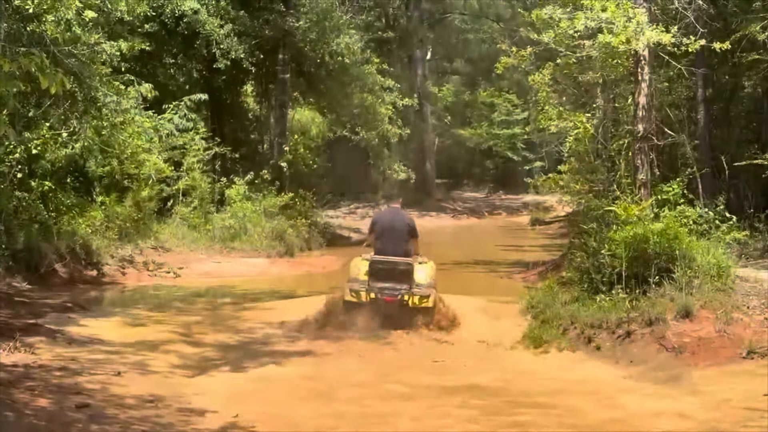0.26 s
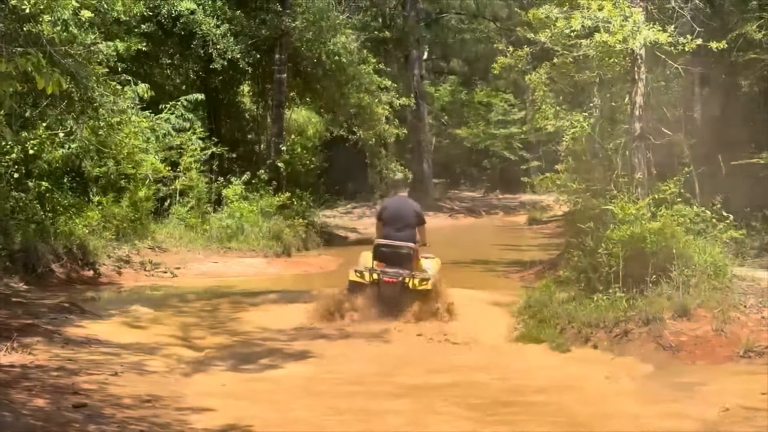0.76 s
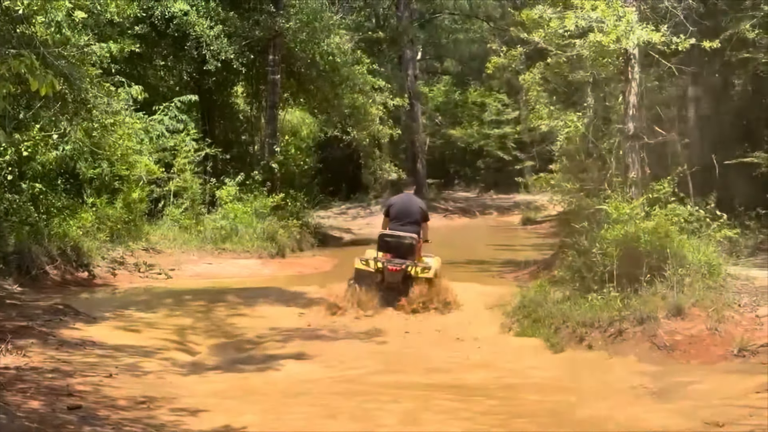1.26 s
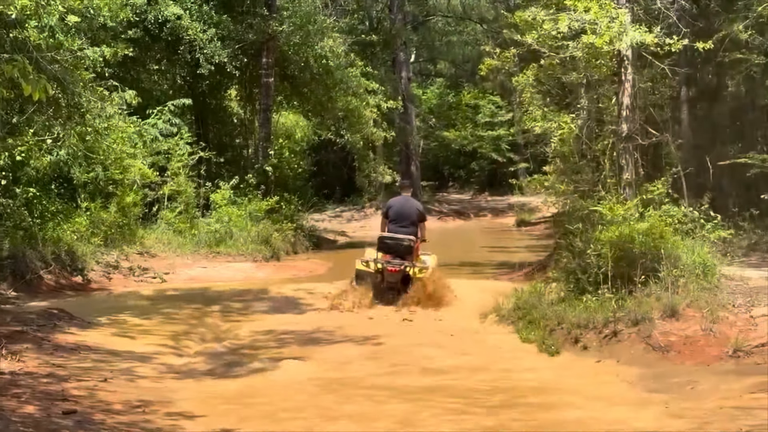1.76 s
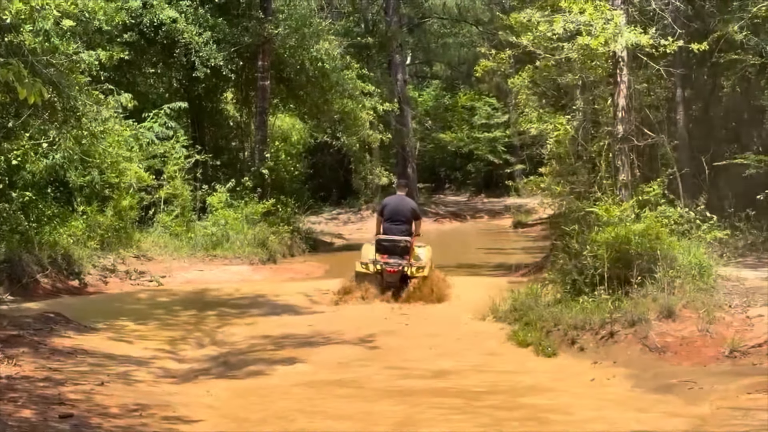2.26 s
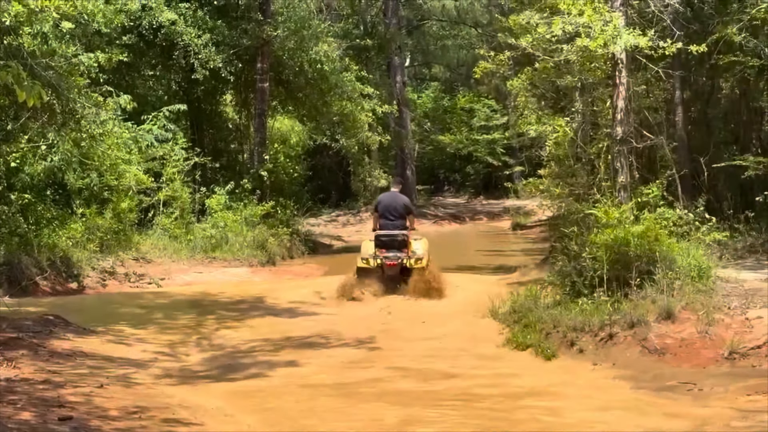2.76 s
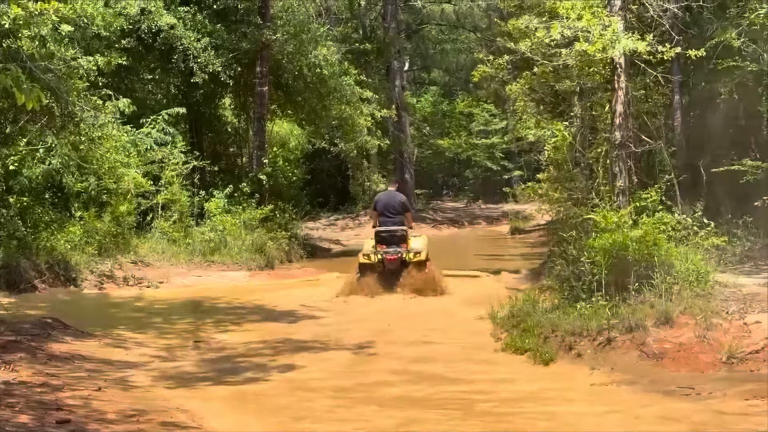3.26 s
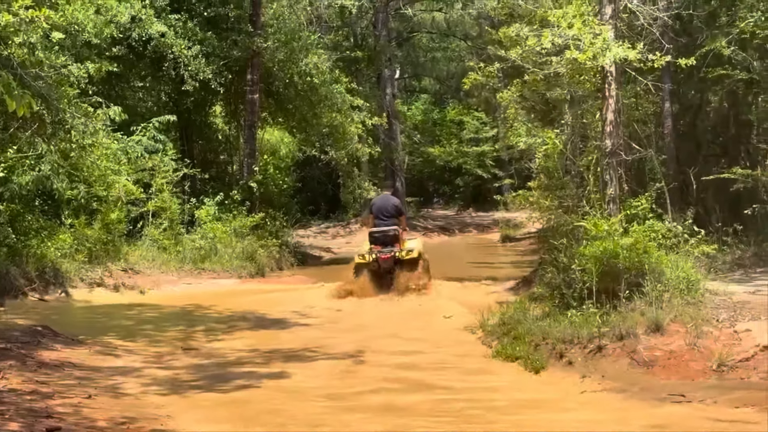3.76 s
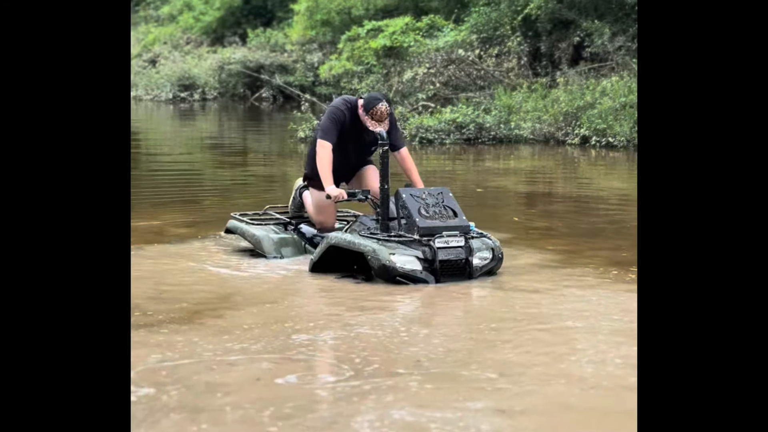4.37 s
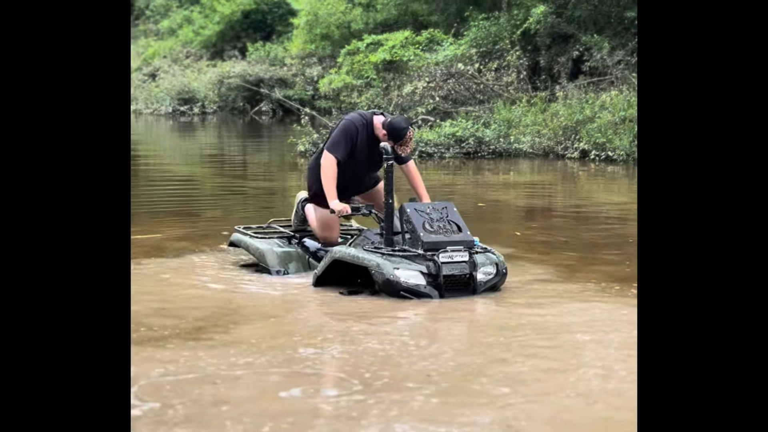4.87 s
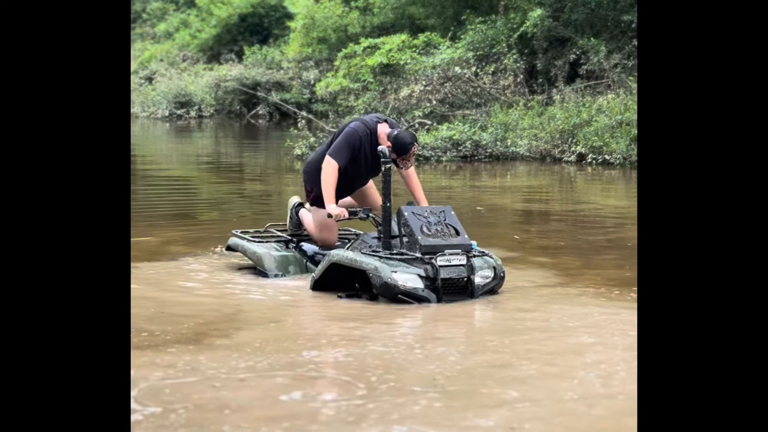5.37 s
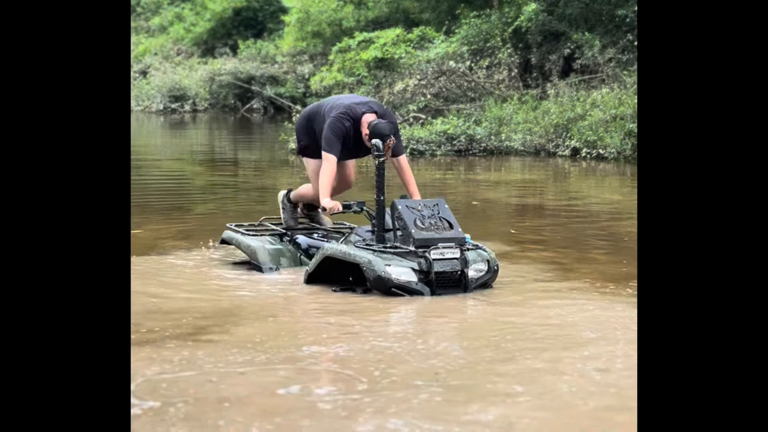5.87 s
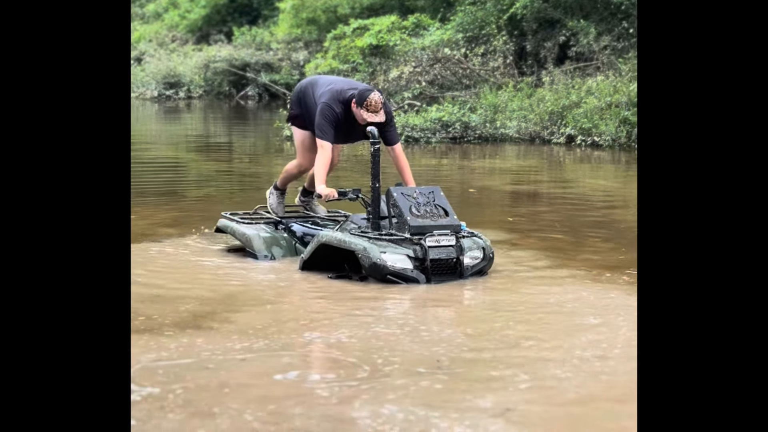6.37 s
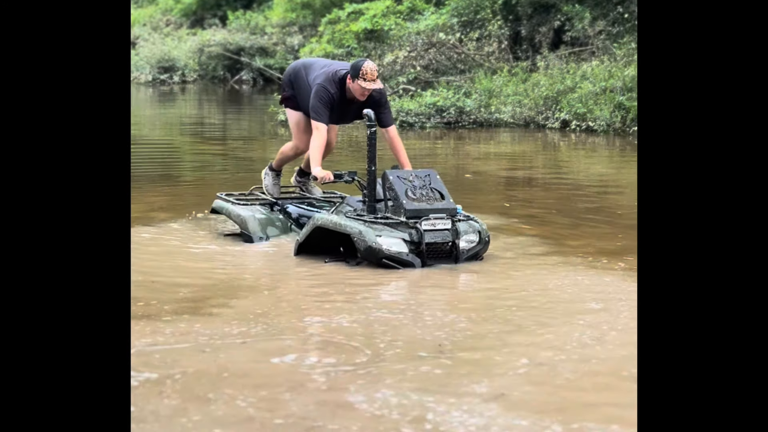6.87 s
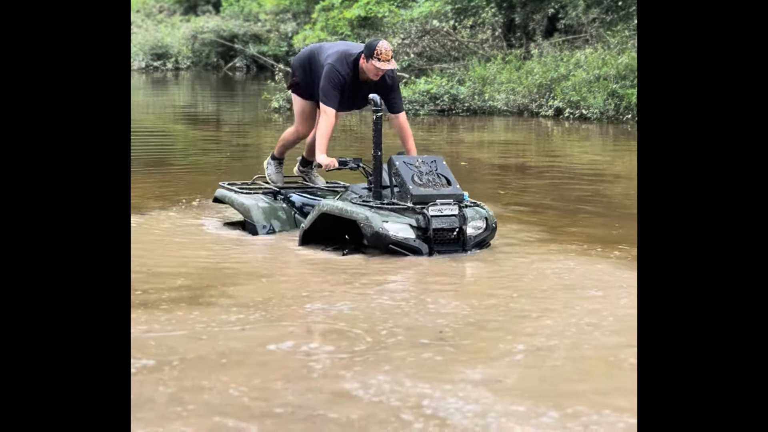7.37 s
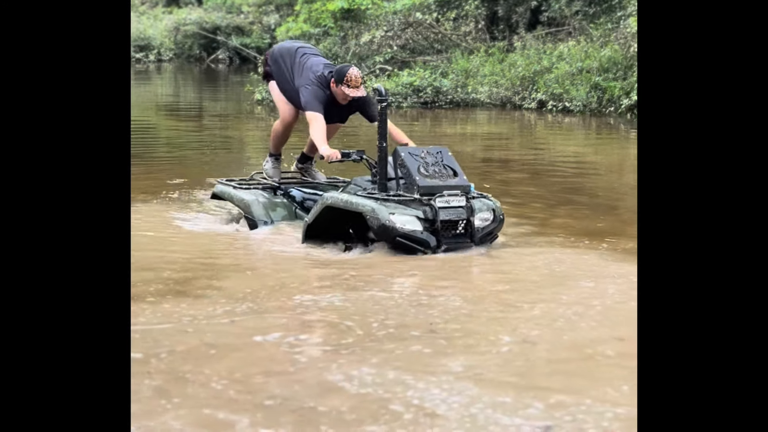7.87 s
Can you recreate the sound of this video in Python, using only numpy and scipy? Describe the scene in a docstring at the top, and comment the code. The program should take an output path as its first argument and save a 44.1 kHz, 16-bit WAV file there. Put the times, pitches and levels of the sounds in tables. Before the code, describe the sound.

Two quad engines in turn, outdoors. First, a muffled uneven chug with a low wavering hum and hollow barking churn, almost no treble. Then, heard closer and clearer, a single-cylinder idle thuds evenly about twelve times a second through water, with soft ticking, popping bubbles and airy hiss that swells as droplets thicken at the end.

```python
"""Two scenes, one after the other. First a twin-cylinder quad bike ploughs through mud, slowed and dull: paired
exhaust thumps, a hollow churning noise that barks now and then, pipe overtones and a low beating hum.
At 3.958 s a single-cylinder quad takes over, idling almost under water: each firing thumps up as a big bubble,
a smaller gulp follows, noise wheezes through intake resonances, a valve knocks, bubbles pop, the creek hisses;
at last the water surges: hiss grows, droplets thicken and a note sings twice."""
import sys
import numpy as np
from scipy import signal
from scipy.fft import rfft, irfft, next_fast_len
from scipy.io import wavfile
from scipy.ndimage import uniform_filter1d, map_coordinates

SR = 44100
rng = np.random.default_rng(int(sys.argv[2]) if len(sys.argv) > 2 else 0)


def log_audio(samples):
    """Write samples as a 16-bit WAV file to the path given in sys.argv[1]."""
    # one column per channel
    frames = np.atleast_2d(samples).T
    # limit to full scale, then quantise
    limited = np.clip(frames, -1, 1)
    pcm = np.round(limited * 32767).astype(np.int16)
    wavfile.write(sys.argv[1], SR, pcm)


N = 358091
T = np.arange(N) / SR
CUT_S = 3.958


def amp(db):
    """Gain of a level in dB."""
    return 10 ** (np.asarray(db) / 20)


def unit(x):
    """x at rms 1."""
    return x / np.sqrt(np.mean(x ** 2) + 1e-20)


def along(points, hz):
    """Each column after the frequency, interpolated on a log-frequency axis."""
    f, *cols = np.transpose(points)
    return [np.interp(np.log(hz + 1), np.log(f + 1), c) for c in cols]


def curves(rows, at_s=T):
    """Each column after the time, interpolated at the given times."""
    s, *cols = np.transpose(rows)
    return [np.interp(at_s, s, c) for c in cols]


def wobble(knots_per_s):
    """A smooth random curve through normally distributed knots."""
    knots = rng.standard_normal(int(N * knots_per_s / SR) + 4)
    return map_coordinates(knots, [T * knots_per_s])


def swell(at_s, width_s):
    """Gaussian bump in time: 1 at its centre, 1/e one width away."""
    return np.exp(-((T - at_s) / width_s) ** 2)


def window(cycle, start, length):
    """Half-sine over a part of each cycle, 0 outside it; start and length in cycles."""
    return np.sin(np.pi * np.clip((cycle - start) % 1 / length, 0, 1))


def filtered(x, response):
    """x times a complex response of frequency."""
    m = next_fast_len(N + 8192)
    return irfft(rfft(x, m) * response(np.fft.rfftfreq(m, 1 / SR)), m)[..., :N]


def noise(envelope_db, spectrum, patchy_db, bins, frames):
    """Two noises under one envelope, with random gain patches in time and pitch, then coloured; rms 1."""
    z = signal.stft(amp(envelope_db) * rng.standard_normal((2, N)), nperseg=256)[2]
    field = uniform_filter1d(rng.standard_normal(z.shape[1:]), bins, 0)
    field = uniform_filter1d(field, frames, 1)
    pair = signal.istft(z * amp(patchy_db * unit(field)), nperseg=256)[1][:, :N]
    return unit(filtered(pair, lambda hz: amp(along(spectrum, hz)[0])))


def thumps(rows, rise_s, fall_s):
    """Gas bubbles (s, dB, Hz): a few swings that swell and die around the strongest push."""
    half = 5500  # samples
    t = np.arange(-half, half) / SR
    shape = np.exp(-(t / np.where(t < 0, rise_s, fall_s)) ** 2)
    out = np.zeros(N + 2 * SR)  # 1 s spare at each end
    for s, db, hz in rows:
        start = round((s + 1) * SR) - half
        out[start:][:len(t)] += amp(db) * shape * np.cos(2 * np.pi * hz * t)
    return out[SR:SR + N]


def gulps(rows):
    """Short bubbles of gas (s, dB, Hz)."""
    return thumps(rows, rise_s=0.0082, fall_s=0.0086)


def trailing(times_s, level_db, hz, slip_s):
    """One small gulp near each time, each with its own delay, strength and pitch."""
    luck = rng.standard_normal((len(times_s), 3))
    s = times_s + slip_s * luck[:, 0]
    return gulps(np.c_[s, level_db + 1.4 * luck[:, 1], hz * amp(.6 * luck[:, 2])])


def cycles(speed, first_s):
    """Engine cycles done at each moment, counted from a given firing."""
    done = np.cumsum(curves(speed)[0]) / SR
    return done - np.interp(first_s, T, done)


def firings(cycle, lag):
    """Times at which the cycle count passes each whole number plus lag."""
    marks = np.arange(np.ceil(cycle[0] - lag), cycle[-1] - lag) + lag
    return np.interp(marks, cycle, T[:len(cycle)])


def fire(times_s, level_db, parts, scatter_db):
    """Every firing sounds all its parts, each at a slightly new strength and pitch."""
    out = np.zeros(N)
    for lag_s, db, hz, rise_s, fall_s in parts:
        luck = rng.standard_normal((len(times_s), 2))
        levels = level_db + db + scatter_db * luck[:, 0]
        out += thumps(np.c_[times_s + lag_s, levels, hz * amp(.25 * luck[:, 1])], rise_s, fall_s)
    return out


# Twin engine speed. Each row: time in seconds, cycles per second.
TWIN_SPEED = [(0, 10.411), (.8, 10.403), (1.8, 10.445), (2.3, 10.357), (2.6, 10.241), (2.9, 10.435),
              (3.95, 10.172)]
TWIN_FIRST_S = .0335  # a front firing


def twin_cycle():
    """Twin engine cycles done, whole at each front firing."""
    return cycles(TWIN_SPEED, TWIN_FIRST_S)


# Weak rear firings. Each row: time in seconds, level change in dB.
WEAK_REAR = [(.743, -11), (1.606, -14), (1.797, -6), (3.728, -17.5)]
# Load on both cylinders. Each row: time in seconds, level change in dB.
TWIN_LOAD = [(0, -2), (1.5, -1), (2.5, 0), (3.95, 0.5)]
# Parts of one firing. Each row: lag from the main push in seconds, relative level in dB,
# nominal pitch in Hz, rise in seconds, fall in seconds.
TWIN_FIRING = [(-0.00055, 0, 91.9, .011, 0.015), (0, -12, 44.8, 0.016, 0.035),
               (-0.0048, -19, 260, 0.0034, 0.0021), (-0.0054, -19.5, 632, 0.0027, 0.01)]
FRONT_DB, REAR_DB = -11, -11
REAR_LAG_CYCLES, GAP_LAG_CYCLES = .365, .68
GAP_DB, GAP_HZ = -21, 89  # faint gulp in the long gap


def twin():
    """Two cylinders fire unevenly: a short gap, then a long one holding a faint exhaust gulp."""
    cycle = twin_cycle()
    front, rear = firings(cycle, 0), firings(cycle, REAR_LAG_CYCLES)
    front, rear = front[front < CUT_S], rear[rear < CUT_S]
    gap = firings(cycle[T < CUT_S], GAP_LAG_CYCLES)
    loss_db = sum(db * (np.abs(rear - s) < .03) for s, db in WEAK_REAR)
    front_db = FRONT_DB + curves(TWIN_LOAD, front)[0]
    rear_db = REAR_DB + curves(TWIN_LOAD, rear)[0] + loss_db
    return (fire(front, front_db, TWIN_FIRING, scatter_db=1.5)
            + fire(rear, rear_db, TWIN_FIRING, scatter_db=0.86)
            + trailing(gap, GAP_DB, GAP_HZ, slip_s=.006))


# Single engine idle speed. Each row: time in seconds, cycles per second.
SINGLE_SPEED = [(4, 12.013), (4.5, 12.012), (5.05, 11.988), (5.7, 11.462), (6.15, 11.631), (6.5, 11.925),
                (6.8, 12.259), (7.1, 11.683), (7.6, 11.452), (8.12, 11.293)]
SINGLE_FIRST_S = 4.0627


def single_cycle():
    """Single engine cycles done, whole at each firing."""
    return cycles(SINGLE_SPEED, SINGLE_FIRST_S)


def idle(lag_cycles):
    """Times of the single engine's cycles, plus a lag, from its first clear firing on."""
    s = firings(single_cycle(), lag_cycles)
    return s[s > SINGLE_FIRST_S - .01]


# Parts of one firing. Each row: lag from the main push in seconds, relative level in dB,
# nominal pitch in Hz, rise in seconds, fall in seconds.
SINGLE_FIRING = [(0.00011, -0.5, 88.3, 0.011, 0.012), (0.0144, -15, 54, 0.029, 0.038),
                 (-.0075, -20, 274, 0.0034, 0.0088), (.0055, -17.5, 238, .004, 0.0056),
                 (.004, -32, 389, 0.011, 0.015)]
# Exhaust bubbling up. Each row: time in seconds, thump level in dB, delay of the following gulp in seconds,
# gulp level in dB, gulp pitch in Hz.
BUBBLING = [(4.06, -10.5, 0.015, -19, 92), (4.16, -6, 0.017, -19, 92), (4.52, -12.5, 0.018, -23, 98),
            (4.75, -8, .019, -18.5, 105), (4.9, -8, 0.011, -16, 104), (5.04, -9.5, 0.011, -20, 90),
            (5.25, -8.5, 0.015, -22, 88), (5.4, -10.5, .016, -16, 70), (5.9, -9, 0.017, -17, 77),
            (6.4, -8.5, 0.0202, -16, 90), (6.9, -10, 0.015, -19.5, 95), (7.15, -8, 0.018, -16.5, 105),
            (7.7, -9.5, 0.0144, -19, 115), (8.1, -8.5, 0.017, -25, 110)]


def single():
    """Each firing pushes up one big exhaust bubble, and a smaller one just after."""
    s = idle(0)
    thump_db, delay_s, gulp_db, gulp_hz = curves(BUBBLING, s)
    return (fire(s, thump_db, SINGLE_FIRING, scatter_db=0.3)
            + trailing(s + delay_s, gulp_db, gulp_hz, slip_s=0.0005))


# Stray gulps of exhaust gas. Each row: time in seconds, level in dB, pitch in Hz.
STRAY_GULPS = [(.283, -18, 109), (1.453, -16, 117.5), (1.637, -17.5, 88.8), (1.736, -18, 92.7),
               (1.831, -18, 107.8), (2.505, -16, 84.5), (2.881, -28, 94.77), (3.848, -18, 88.6),
               (3.98, -15, 84.4), (3.996, -16, 108), (7.85, -21, 121), (7.902, -21, 113), (8.029, -16, 115),
               (8.073, -15.5, 102), (8.106, -18, 101)]
RUN_FIRST_S, RUN_EVERY_S = 6.026, 0.098
RUN_DB, RUN_DB_PER_GULP, RUN_HZ = -10.5, -0.5, 94


def strays(run_count):
    """Single exhaust gulps between firings, and one even run that slips ever later behind the firings."""
    run = [(RUN_FIRST_S + k * RUN_EVERY_S, RUN_DB + k * RUN_DB_PER_GULP, RUN_HZ) for k in range(run_count)]
    return gulps(STRAY_GULPS + run)


# Hollow barks. Each row: time in seconds, level in dB, pitch in Hz.
BARKS = [(.056, -22, 610), (.152, -28, 713), (.242, -15, 701), (.274, -23, 600), (.401, -19, 602),
         (.432, -17.5, 600), (.56, -22, 605), (.622, -26, 620), (.705, -26, 616), (.868, -23.5, 577),
         (.934, -23.5, 601), (1.003, -19.5, 614), (1.084, -29, 690), (1.284, -21, 617), (1.538, -24.5, 583),
         (1.598, -27, 577), (1.758, -21.5, 631), (2.072, -25, 586), (2.144, -23.5, 612),
         (3.133, -22.5, 752), (3.21, -22, 615), (3.453, -23.5, 734), (3.614, -19.5, 606),
         (3.656, -27.5, 618), (3.781, -32.5, 490)]
BARK_RISE_S, BARK_FALL_S = .002, .014


def barks():
    """Short rings of the hollow note; they start fast and die slower."""
    return thumps([(s + BARK_RISE_S, db, hz) for s, db, hz in BARKS], BARK_RISE_S, BARK_FALL_S)


# Roar level. Each row: time in seconds, level in dB.
ROAR_LEVEL = [(0, -27.5), (.44, -26.5), (.68, -30), (1, -28), (3, -28.5), (3.95, -26.5)]
# Roar colour. Each row: frequency in Hz, relative density in dB.
ROAR_BAND = [(30, -27.5), (60, -12), (150, -3.5), (250, -10.5), (400, -11.5), (480, -3.5), (545, -6),
             (600, -2), (655, -8), (705, -2.5), (775, -7), (820, -6.5), (870, -12), (990, -21), (1130, -16),
             (1430, -22), (1530, -19.5), (1610, -26.5), (2050, -35.5), (2300, -37.5), (2600, -44),
             (2800, -48), (3600, -61), (7000, -85)]
# Hollow note colour. Each row: frequency in Hz, relative density in dB.
HUM_BAND = [(400, -120), (520, -35), (575, -8), (614, 0), (650, -8), (705, -10), (780, -35), (1000, -120)]
# Swells of the hollow note. Each row: time in seconds, rise over rest in dB.
HUM_SWELLS = [(.3, 10), (.48, 8)]
HUM_REST_DB, HUM_SWELL_S = -35, 0.086
# Faint dull treble level, in patches. Each row: time in seconds, level in dB.
TREBLE_LEVEL = [(0, -79.5), (.46, -75), (.7, -94), (.84, -75.5), (1.02, -78), (1.13, -90.5), (1.25, -77),
                (1.42, -78), (1.6, -92.5), (3.1, -87.5), (3.95, -87.5)]
# Its colour. Each row: frequency in Hz, relative density in dB.
TREBLE_BAND = [(2000, -29), (3000, -5.5), (4000, 1.5), (4500, -2), (4900, -10), (6500, -17)]
HUSH_DB, HUSH_S = -2.5, 0.0051  # dip before each bark: depth; lead and width


def mud(beats):
    """Dense noise breathing with the engine cycle and the beat; a hollow note rings, treble swells in patches."""
    cycle = twin_cycle()
    hum_db = HUM_REST_DB + sum(db * swell(s, HUM_SWELL_S) for s, db in HUM_SWELLS)
    hush_db = sum(HUSH_DB * swell(s - HUSH_S, HUSH_S) for s, _, _ in BARKS)
    breath_db = 1.2 * window(cycle, .6, .35) + 1.2 * window(cycle, .12, .2) + 1.1 * wobble(70)
    roar_env_db = hush_db + breath_db + 1.0 * window(beats, 0, 0.19)
    hum_env_db = hush_db + 1.2 * wobble(30) + 5 * window(beats, 0.11, 0.89)
    roar = noise(roar_env_db, ROAR_BAND, patchy_db=1.9, bins=1, frames=12)
    hum = noise(hum_env_db, HUM_BAND, patchy_db=1.5, bins=1, frames=1)
    treble = noise(2 * wobble(60), TREBLE_BAND, patchy_db=5.5, bins=1, frames=8)
    return amp(curves(ROAR_LEVEL)[0]) * roar + amp(hum_db) * hum + amp(curves(TREBLE_LEVEL)[0]) * treble


# Low hum's beat, perhaps the tyre lugs. Each row: time in seconds, beats per second.
LUG_RATE = [(0, 41), (.3, 37.5), (.55, 29.4), (.8, 36), (1.12, 29.4), (1.45, 33.7), (1.65, 26), (2.1, 31.9),
            (2.65, 31.8), (3.0, 31.4), (3.4, 33.7), (3.94, 31.6)]
# Overtones of the beat. Each row: multiple of the beat, relative level in dB.
LUG_TONES = [(4, 5.5), (5, 1), (6, -4), (7, -3), (8, -4.5), (9, -8.5), (10, -8)]
LUG_DB = -39.5


def lugs():
    """A drifting beat heard as a stack of slightly unsteady tones; also returns beats done."""
    beats = np.cumsum(curves(LUG_RATE)[0]) / SR
    tones = sum(amp(db + 2 * wobble(4)) * np.cos(2 * np.pi * k * beats + .3 * wobble(5))
                for k, db in LUG_TONES)
    return amp(LUG_DB) * tones, beats


# Exhaust pipe overtones. Each row: multiple of the engine cycle, mean level in dB.
PIPE_TONES = [(15, -39), (19, -41.5), (25, -44), (27, -45.5), (31, -44.5), (58, -42), (60, -42.5),
              (67, -46), (70, -46.5)]


def pipe():
    """The exhaust pipe favours a few overtones of the engine cycle."""
    cycle = twin_cycle()
    return sum(amp(db + 2.0 * wobble(6.5)) * np.cos(2 * np.pi * k * cycle + .5 * wobble(6))
               for k, db in PIPE_TONES)


# Casing modes. Each row: nominal pitch in Hz, relative level in dB, 60 dB decay in seconds.
CASING_MODES = [(658, -0.5, 0.038), (704, 2.5, 0.039), (1323, -14.5, 0.085)]
KNOCK_DB, KNOCK_DB_PER_S = -31.5, 0.8  # at the change of scene; growth after it


def valve():
    """About half a cycle after each firing a valve seats and the casing rings briefly."""
    out, t = np.zeros(N + SR), np.arange(3000) / SR
    onset = 1 - np.exp(-t / 0.0039)
    for s in idle(.48):
        ring = 0
        for hz, db, t60_s in CASING_MODES:
            decay = amp(db + rng.normal(0, 0.92) - 60 * t / t60_s)
            ring = ring + decay * np.sin(2 * np.pi * hz * amp(rng.normal(0, 0.15)) * t)
        knock_db = KNOCK_DB + KNOCK_DB_PER_S * (s - CUT_S) + rng.normal(0, 0.65)
        out[round(s * SR):][:len(t)] += amp(knock_db) * ring * onset
    return out[:N]


# Froth round the exhaust. Each row: time in seconds, level in dB.
FROTH_LEVEL = [(3.96, -59), (4.3, -44.5), (5, -57.5), (5.8, -48), (6.2, -61), (6.85, -40), (7.4, -48),
               (7.8, -38.5), (8.12, -38.5)]
# Note singing in the surge. Each row: start in seconds, length in seconds, level in dB.
SURGE_NOTE = [(7.657, 0.3, -33), (7.975, 0.16, -26.5)]
NOTE_HZ = 364
BUBBLE_DB, BUBBLE_RANGE_DB = 6.5, 9.5  # smallest bubble over the froth; span of sizes


def bubbles(count):
    """Small bubbles pop at random round the exhaust, louder as the water froths; a note sings in the surge."""
    when, pitch, size = rng.random((count, 3)).T
    s = CUT_S + when * (N / SR - CUT_S)
    level_db = curves(FROTH_LEVEL, s)[0] + BUBBLE_DB + BUBBLE_RANGE_DB * size
    small = thumps(np.c_[s, level_db, 170 * 2.6 ** pitch], rise_s=0.0067, fall_s=0.0084)
    level = sum(amp(db) * np.sin(np.pi * np.clip((T - start) / length, 0, 1))
                for start, length, db in SURGE_NOTE)
    note = level * amp(1.4 * wobble(25)) * np.sin(2 * np.pi * NOTE_HZ * T + 1.6 * wobble(45))
    return small + note


# Clear bubble pops. Each row: time in seconds, level in dB, pitch in Hz.
CLEAR_POPS = [(4.276, -25.5, 236), (4.533, -22.5, 197), (5.475, -33, 199), (5.722, -24.5, 202),
              (5.82, -35, 238), (5.905, -24, 178), (6.165, -32.5, 308), (6.514, -23, 235),
              (6.797, -25, 362), (6.954, -28, 400), (6.84, -30, 240), (6.953, -33, 726),
              (7.005, -19.5, 207), (7.152, -27, 209), (7.203, -33, 610), (7.257, -27, 604),
              (7.369, -31, 620), (7.426, -23.5, 199), (7.64, -27.5, 686), (7.641, -20, 218),
              (7.684, -28, 216), (7.777, -35, 506), (7.832, -32, 447), (8.001, -32, 670), (8.09, -23, 474)]
POP_RISE_CYCLES, POP_FALL_CYCLES = .8, 2.7
FIZZ_DB, FIZZ_RANGE_DB, FIZZ_TILT_DB = -53, 9.5, -14  # smallest, lowest droplet; size span; highest over lowest


def pops(count):
    """Single bubbles that last a few swings, and droplets that thicken as the water surges."""
    big = sum(thumps([(s + 1 / hz, db, hz)], POP_RISE_CYCLES / hz, POP_FALL_CYCLES / hz)
              for s, db, hz in CLEAR_POPS)
    when, pitch, size = rng.random((count, 3)).T
    s = N / SR - 1.5 * when ** 1.6  # crowded towards the end
    level_db = FIZZ_DB + FIZZ_RANGE_DB * size + FIZZ_TILT_DB * pitch
    return big + thumps(np.c_[s, level_db, 450 * 5.5 ** pitch], rise_s=0.0011, fall_s=.0025)


# Intake tube resonances, applied twice. Each row: centre in Hz, width in Hz and gain in dB of one pass.
INTAKE_MODES = [(1665, 74, 2), (1785, 106, 5), (3366, 116, 1.5), (3583, 100, -3), (4125, 78, -5),
                (5320, 260, -4), (6010, 58, -8.5), (6460, 110, -9)]
WHEEZE_DB, WHEEZE_DB_PER_S = -51.5, 1.5  # growth in the surge
SNAP_AT_CYCLES, SNAP_DECAY_CYCLES = -.27, 0.1
DRAW_AT_CYCLES, DRAW_FOR_CYCLES = -.13, 0.19
LEAK = 0.27  # steady flow between strokes


def intake(cycle):
    """Air noise through tube resonances: the valve opens at once, then the piston draws; rms 1."""
    def tube(f):
        return sum(amp(db) * 1j * f * w / (c * c - f * f + 1j * f * w) for c, w, db in INTAKE_MODES)

    snap = 1.4 * np.exp(-((cycle - SNAP_AT_CYCLES) % 1) / SNAP_DECAY_CYCLES)
    draw = window(cycle, DRAW_AT_CYCLES, DRAW_FOR_CYCLES) ** .5
    breath = (snap + draw) * amp(.7 * wobble(13)) + LEAK
    return unit(filtered(breath * rng.standard_normal((2, N)), lambda f: tube(f) ** 2))


# Noise colours of hiss, gurgle and froth. Each row: frequency in Hz, relative density in dB.
HISS_BAND = [(200, -3), (390, 2.5), (480, -1.5), (800, -0.5), (1010, -8), (1075, -5), (1180, -10),
             (1500, -9.5), (2500, -15), (3800, -22), (4550, -24.5), (5300, -22.5), (6600, -22.5),
             (7800, -25.5), (10200, -24.5), (15600, -36)]
GURGLE_BAND = [(30, -24.5), (60, -14), (100, 2), (160, -4.5), (250, -13), (380, -19.5), (600, -38.5),
               (1200, -53)]
FROTH_BAND = [(120, -22), (200, -2), (280, -13), (350, -3), (420, -7.5), (700, -10.5), (1500, -24),
              (3000, -30), (6000, -62)]
HISS_DB, SURGE_S, SURGE_DB_PER_S = -41.5, 7.45, 11.5
HISS_SWELL_S, HISS_SWELL_WIDTH_S, HISS_SWELL_DB = 6.8, 0.24, 3.1
GURGLE_DB, GURGLE_DB_PER_FROTH_DB = -31, 0.42


def creek():
    """Hiss that lifts at each firing, gurgle and froth round the exhaust, air wheezing into the intake tube."""
    cycle = single_cycle()
    froth_db, = curves(FROTH_LEVEL)
    surging_s = np.clip(T - SURGE_S, 0, None)
    hiss_db = HISS_DB + SURGE_DB_PER_S * surging_s
    hiss_db = hiss_db + HISS_SWELL_DB * swell(HISS_SWELL_S, HISS_SWELL_WIDTH_S)
    wheeze_db = WHEEZE_DB + WHEEZE_DB_PER_S * surging_s + 0.87 * wobble(5.4)
    gurgle_db = GURGLE_DB + GURGLE_DB_PER_FROTH_DB * (froth_db - froth_db[T > CUT_S].mean())
    hiss_env_db = 2.0 * window(cycle, -0.13, 0.39) + 0.94 * wobble(100)
    gurgle_env_db = 4 * window(cycle, 0.02, 0.46) + 0.89 * wobble(25)
    hiss = noise(hiss_env_db, HISS_BAND, patchy_db=1.76, bins=5, frames=3)
    gurgle = noise(gurgle_env_db, GURGLE_BAND, patchy_db=3.0, bins=1, frames=4)
    froth = noise(1.1 * wobble(40), FROTH_BAND, patchy_db=2.0, bins=2, frames=4)
    water = amp(hiss_db) * hiss + amp(gurgle_db) * gurgle + amp(froth_db) * froth
    return water + amp(wheeze_db) * intake(cycle)


def ports(pair, table):
    """Two versions of a sound mixed into left and right as two microphone ports hear them."""
    m = next_fast_len(N + 8192)
    alike, lead, tilt_db = along(table, np.fft.rfftfreq(m, 1 / SR))
    turn = np.arccos(np.clip(alike, 0, 1)) / 2
    a, b = rfft(pair, m)
    sign = np.array([[1], [-1]])  # left, right
    mixed = np.cos(turn) * a + sign * np.sin(turn) * b
    both = mixed * np.exp(sign * .5j * lead) * amp(sign * tilt_db / 2)
    return irfft(both, m)[:, :N]


# Microphone ports in each scene. Each row: frequency in Hz, likeness of the ports from 0 to 1,
# lead of the left in radians, left over right in dB.
FAR_PORTS = [(60, .998, 0, 0), (300, .99, 0, 0), (600, .98, 0, 0), (750, .85, .6, .5), (1000, .65, 2.6, 2),
             (1300, .85, 3.2, 4), (1800, .7, 4.1, -2), (2400, .68, 4.5, -6), (3300, .8, 6, -1),
             (5000, .95, 2 * np.pi, 0)]
NEAR_PORTS = [(200, .9995, 0, 0), (300, .96, 0, 0), (450, .95, 0, 0), (700, .9, 0, -2), (1300, .88, 0, 2),
              (1750, .97, 0, 0), (1950, 1, 0, 0), (5000, 1, 0, 0), (5600, .85, -.3, 0), (7000, .8, -1.2, 0),
              (10000, .8, -2.5, 0), (10500, 1, -np.pi, 0), (13500, 1, -np.pi, 0), (14000, .65, -3.9, 0),
              (15600, .6, -4.5, 0)]
DULL_HZ = 6600  # treble limit of the slowed scene
SLOW_HZ, IMAGE_DB = 9600, -64.5  # low sampling rate of slowed playback; gain of the bass copy


def scene():
    """The twin in mud fades out in 38 ms, then the single in the creek fades in over 28 ms."""
    stray = strays(run_count=8)
    aside = amp(np.array([[.14], [-.14]]) * wobble(5))  # left-right balance sways a little
    tones, beats = lugs()
    churn = mud(beats) + np.array([[1], [.4]]) * barks()
    far = aside * (twin() + stray + tones + pipe()) + ports(churn, FAR_PORTS)
    close = np.array([[1], [.3]]) * (valve() + bubbles(count=150) + pops(count=350))
    chug = single() + stray
    quadrature = signal.hilbert(chug, next_fast_len(N))[:N].imag
    chug = np.array([chug, .6 * quadrature])  # reaches one port a little sooner
    near = aside * ports(creek() + close + chug, NEAR_PORTS)
    far = filtered(far, lambda hz: 1 / (1 + (hz / DULL_HZ) ** 12))
    # slowed playback mirrors a faint copy of the bass around its low sampling rate
    bass = filtered(far.mean(axis=0), lambda hz: hz < 300)
    far = far + amp(IMAGE_DB) * bass * np.cos(2 * np.pi * SLOW_HZ * T)
    return far * np.clip((CUT_S - T) / 0.038, 0, 1) + near * np.clip((T - CUT_S) / 0.028, 0, 1)


TOP_HZ, BASS_CUT_HZ = 15750, 42


def record(dry):
    """Cuts the deepest bass with a steep slope and keeps nothing above the band limit."""
    return filtered(dry, lambda hz: (hz < TOP_HZ) / np.sqrt(1 + (BASS_CUT_HZ / (hz + 1)) ** 8))


dry = scene()
out = record(dry)
log_audio(out)
```